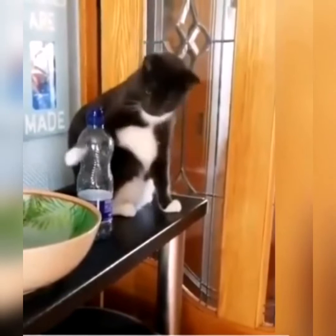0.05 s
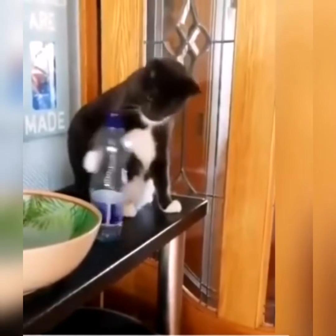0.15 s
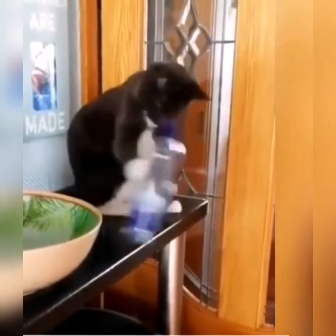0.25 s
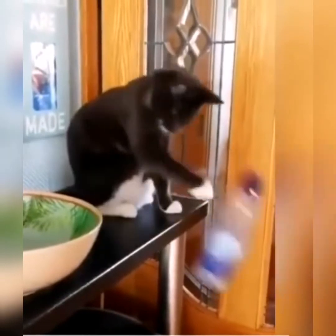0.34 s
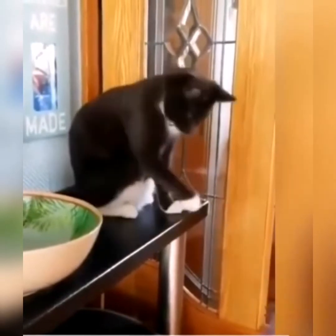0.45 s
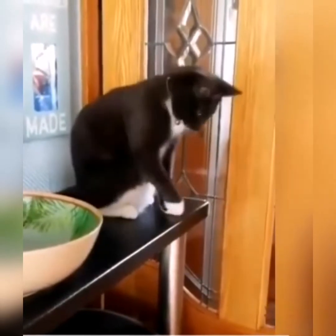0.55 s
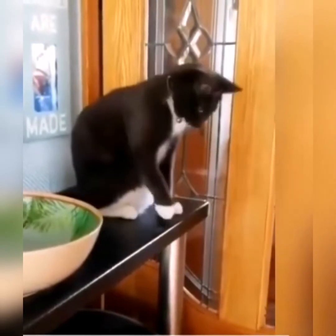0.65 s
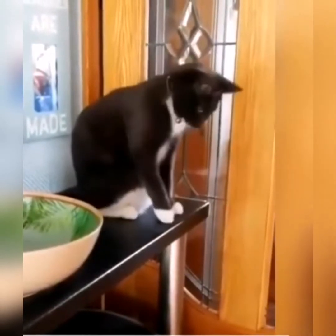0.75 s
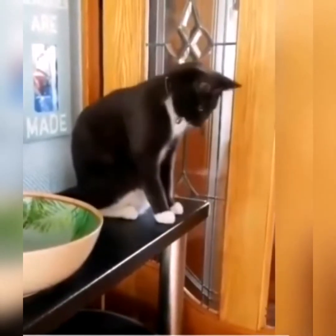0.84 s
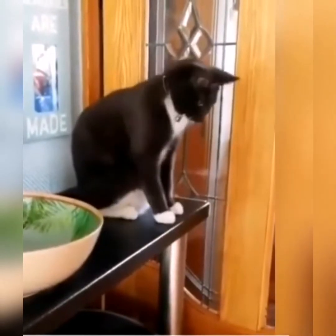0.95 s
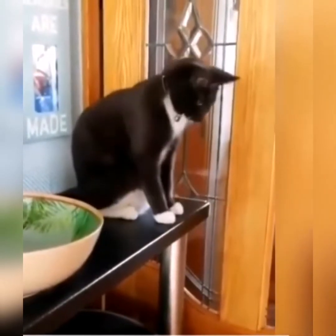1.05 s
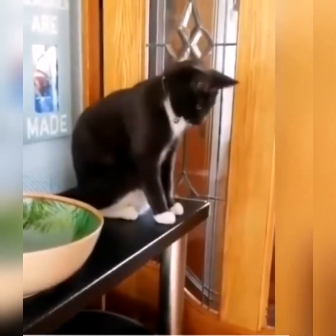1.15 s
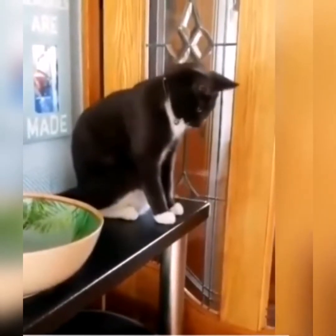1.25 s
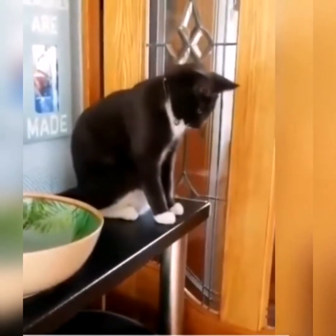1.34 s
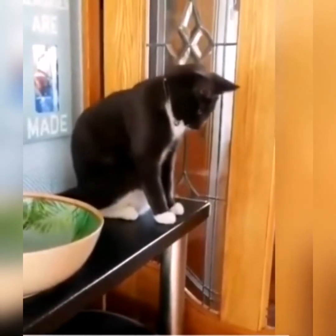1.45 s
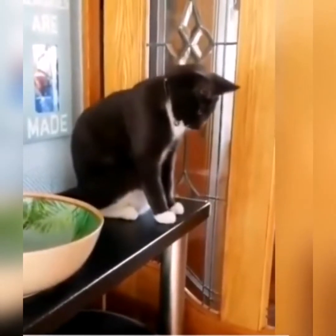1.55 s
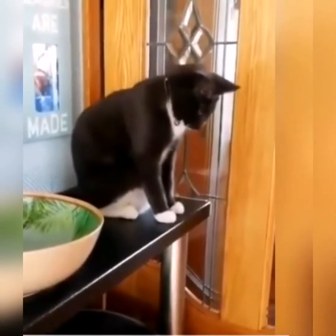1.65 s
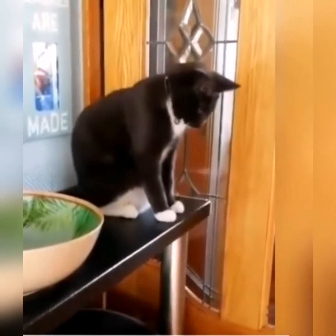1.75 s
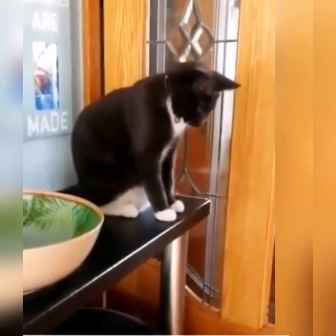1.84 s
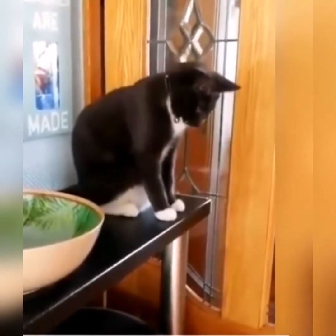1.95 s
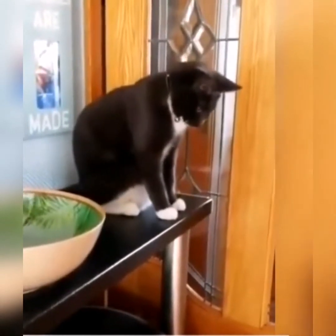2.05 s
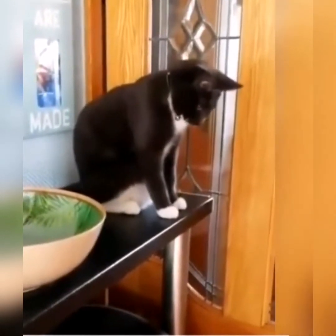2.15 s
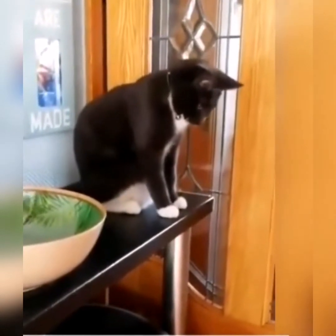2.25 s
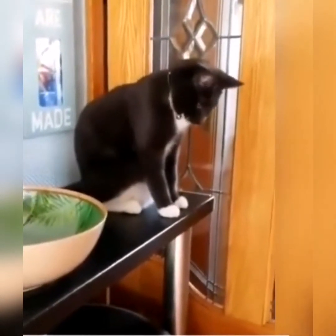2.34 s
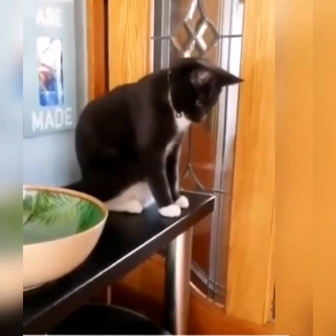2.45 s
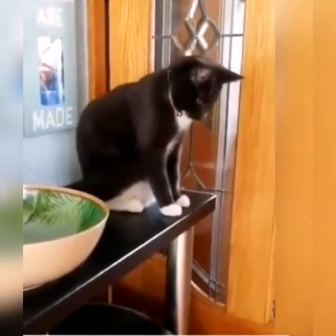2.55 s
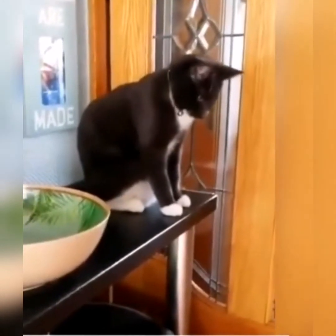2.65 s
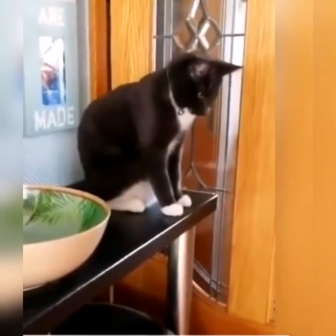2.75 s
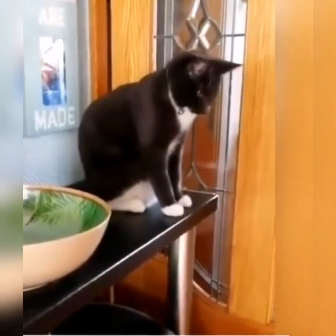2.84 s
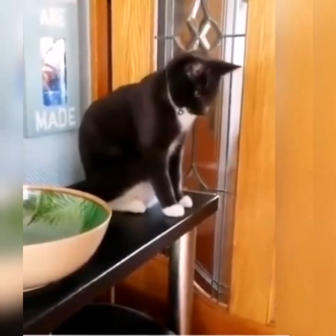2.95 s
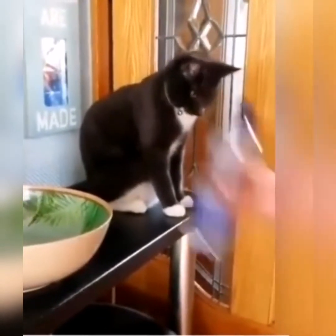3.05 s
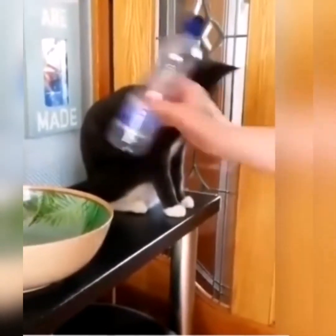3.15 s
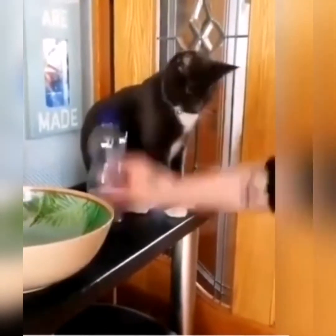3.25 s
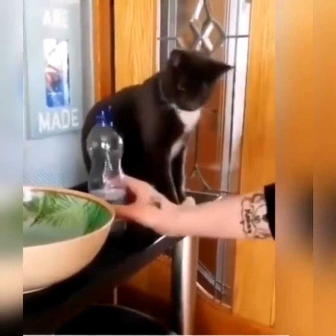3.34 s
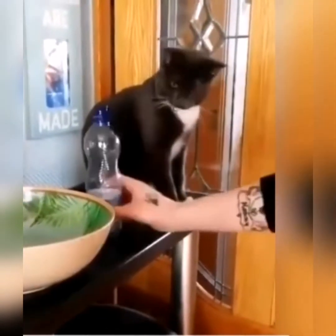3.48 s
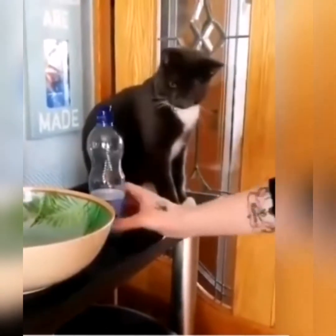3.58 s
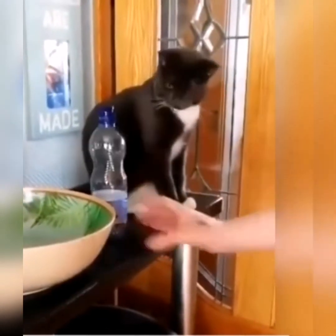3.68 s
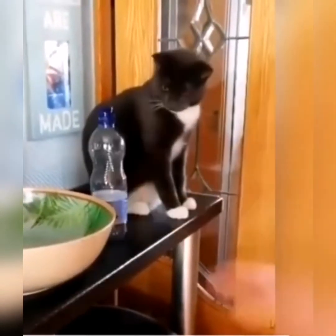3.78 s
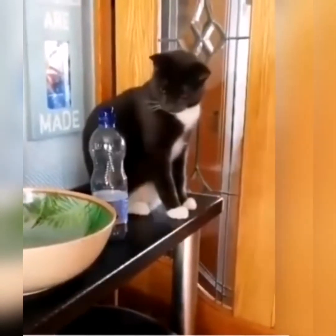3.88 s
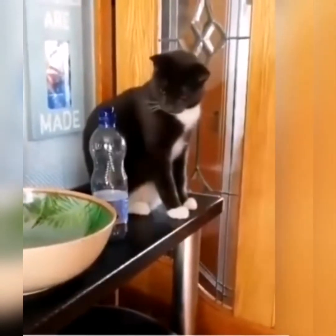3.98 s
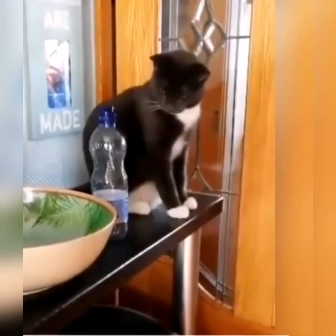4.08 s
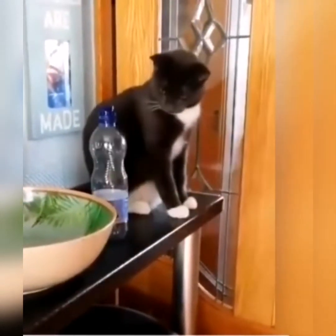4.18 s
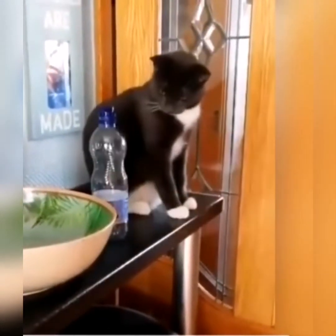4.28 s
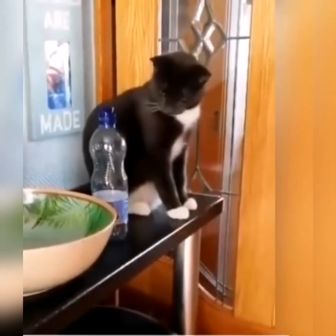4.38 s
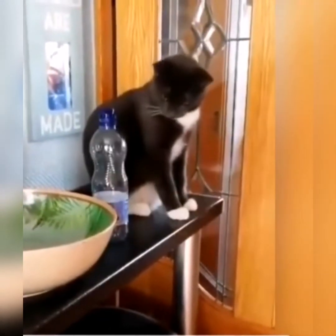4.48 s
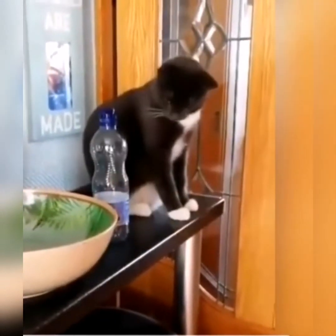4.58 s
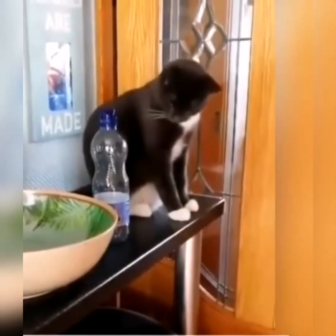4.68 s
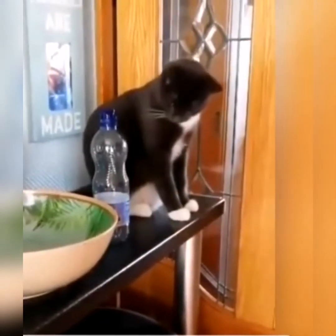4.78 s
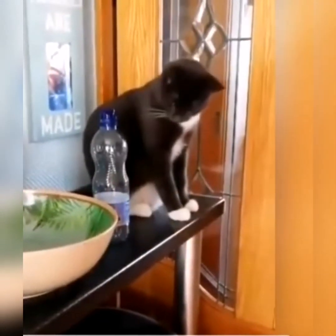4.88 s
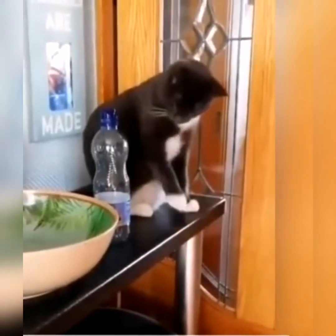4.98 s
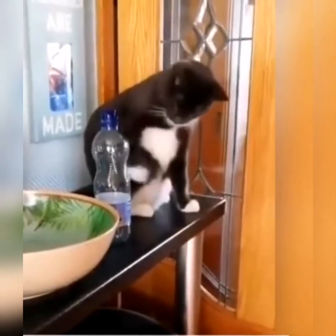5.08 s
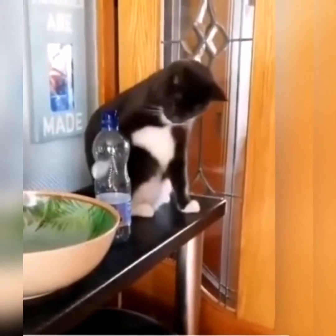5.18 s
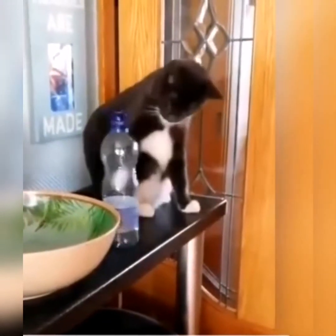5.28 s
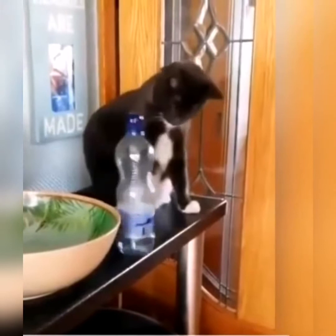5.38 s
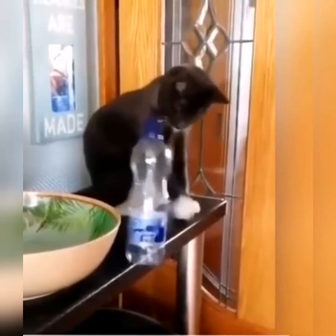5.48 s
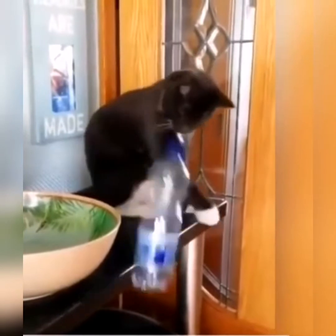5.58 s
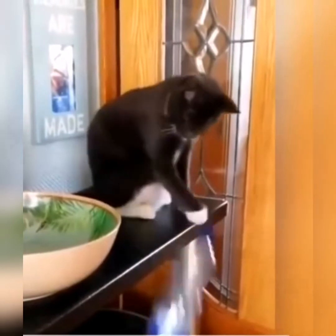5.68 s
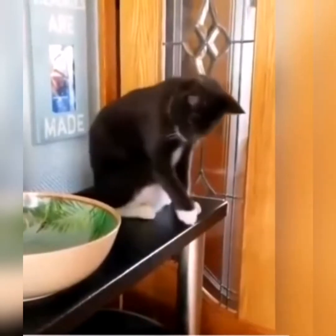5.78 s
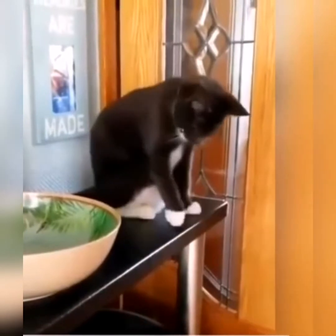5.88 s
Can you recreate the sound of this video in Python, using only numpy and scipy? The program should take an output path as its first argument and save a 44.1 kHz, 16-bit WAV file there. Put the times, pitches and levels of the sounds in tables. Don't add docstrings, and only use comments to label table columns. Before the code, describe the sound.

An empty plastic bottle drops from a shelf, bounces hollowly on a hard floor, is knocked back upright, then falls again with a clatter.

```python
import sys
import numpy as np
from scipy import signal
from scipy.fft import rfft, irfft, dct
from scipy.io import wavfile
from scipy.ndimage import uniform_filter1d

SR = 44100
rng = np.random.default_rng(int(sys.argv[2]) if len(sys.argv) > 2 else 0)


def gain_from_decibels(decibels):
    exponent = np.asarray(decibels, float) / 20
    return 10 ** exponent


def dump(signal):
    limited = np.clip(np.atleast_2d(signal).T, -1, 1)
    pcm = np.round(limited * 32767).astype(np.int16)
    wavfile.write(sys.argv[1], SR, pcm)


N = 261072
TOP_HZ = 9750


def on_log(table, hz):
    f, v = np.transpose(table)
    return np.interp(np.log(hz), np.log(f), v)


def unit(x):
    return x / np.sqrt(np.mean(x ** 2))


def band(x, lo_hz, hi_hz, order=2):
    sos = signal.butter(order, [lo_hz, min(hi_hz, .45 * SR)], "band", fs=SR, output="sos")
    return signal.sosfilt(sos, x)


def walk(rate_hz):
    hold, levels = int(SR / rate_hz), 1.3 * rng.standard_normal(2048)
    steps = np.repeat(levels[:N // hold + 1], hold)
    return uniform_filter1d(uniform_filter1d(steps, hold), hold)[:N]


# f/Hz, correlation [-1..1]
LIKENESS = [(40, .93), (150, .96), (400, .1), (1000, .08), (3000, 0), (5000, .05), (8000, .45)]


def pair(size, hz):
    like = np.clip(on_log(LIKENESS, hz), 0, .99)
    mid, side = rng.standard_normal((2, size))
    return np.sqrt((1 + like) / 2) * mid + np.sqrt((1 - like) / 2) * side * np.array([[1], [-1]])


# f/Hz, level/dB per Hz
BACKGROUND = [(25, -23.5), (65, 0), (118, -12), (194, -2), (421, -5.5), (597, -15.5),
              (868, -7.5), (1200, -14), (1300, -15.5), (1840, -18), (4500, -26), (8230, -28), (9800, -39.5),
        (12700, -62)]


def hiss():
    out, swell_db = 0, walk(1.0)
    for hz in 28 * 2 ** np.arange(0, 8.6, 1 / 3):
        db = on_log(BACKGROUND, hz) + swell_db / 2 + 2.2 * walk(12)
        out = out + gain_from_decibels(db) * band(pair(N, hz), hz * 2 ** (-1 / 6), hz * 2 ** (1 / 6))
    return unit(out) * gain_from_decibels(-56.5)


# t/s, length/s, start level/dB, end level/dB
RUMBLES = [(0., 0.0582, -46, -39.5), (0.079, 0.594, -46.5, -57.5), (0.606, 0.1506, -51.5, -52.5),
           (2.866, 0.0625, -34.5, -39.5), (2.92, 0.4, -33.5, -45), (3.181, 0.068, -41, -40),
           (3.27, 0.1736, -51.5, -37.5), (3.514, 0.213, -42.5, -41.5), (3.671, 0.1605, -35, -36.5),
           (3.839, 0.3428, -44.5, -45), (4.213, 0.346, -45, -55.5), (5.113, 0.215, -42.5, -43),
           (5.332, 0.2474, -45.5, -42.5), (5.6, 0.32, -45.5, -59.5)]


def rumble():
    edge_s, calm_db = 0.021, -60
    centre_hz, hz_per_db = 215.07, 1.0
    t, power = np.arange(N) / SR, gain_from_decibels(calm_db) ** 2
    for s, length_s, from_db, to_db in RUMBLES:
        edges = np.clip(np.minimum(t - s, s + length_s - t) / edge_s + .5, 0, 1)
        power = power + edges * gain_from_decibels(np.interp(t, [s, s + length_s], [from_db, to_db])) ** 2
    db = 10 * np.log10(power)
    lowpass = signal.butter(4, 63, fs=SR, output="sos")
    murmur = signal.sosfilt(lowpass, rng.standard_normal((4, N)))
    phase = 2 * np.pi * np.cumsum(centre_hz + hz_per_db * (db + 50)) / SR
    mid, side = murmur[:2] * np.cos(phase) + murmur[2:] * np.sin(phase)
    return unit(mid + gain_from_decibels(-43.0) * side * np.array([[1], [-1]])) * gain_from_decibels(db + 1.0 * walk(30) - 5.5)


# f/Hz, t60/s
ROOM_T60 = [(300, 0.63), (1000, 0.49), (3000, 0.4), (6000, 0.36), (11000, 0.48)]


def room(feed):
    t, tail = np.arange(SR * 3 // 4) / SR, 0
    for hz in 177 * 2. ** np.arange(7):
        clumps = gain_from_decibels(4.4 * np.exp(-t / 0.18) * walk(250)[:len(t)])
        octave = band(pair(len(t), hz) * clumps, hz / np.sqrt(2), hz * np.sqrt(2))
        tail = tail + octave * 1000. ** (-t / on_log(ROOM_T60, hz))
    onset = 1 - np.exp(-(t / 0.0013) ** 2)
    tail = unit(tail * onset) / np.sqrt(len(t))
    return signal.fftconvolve(feed[None], tail, axes=1)[:, :N]


# peak t/s, level/dB, swell/s, fade/s per 20 dB (negative:
# rises on), f/Hz
SINGS = [(.06, -57.5, 0.046, .08, 934), (.125, -44, 0.0234, 0.136, 925), (.132, -46.5, 0.024, 0.068, 2924),
         (.15, -49.5, 0.0273, 0.0759, 3337), (.135, -52.5, 0.017, 0.0065, 6150),
         (.628, -30.5, 0.0071, 0.07, 2345), (.645, -27.5, 0.0123, 0.0967, 1347),
         (.624, -29, 0.0057, 0.07, 1250), (.65, -31, 0.0194, 0.1181, 718), (.69, -34, 0.0187, 0.0953, 1050),
         (.7, -36, 0.0146, .06, 2401), (.87, -39.5, 0.0345, 0.1557, 530), (.85, -38, .015, 0.1655, 1498),
         (.88, -43, 0.0297, 0.08, 2202), (.9, -39, 0.0423, 0.09, 1077), (.905, -44.5, 0.0192, 0.0043, 651),
         (.98, -44.5, 0.0277, 0.19, 620.4), (1.57, -43.5, .012, 0.07, 2144),
         (1.61, -46.5, 0.0194, 0.0841, 1803), (2.65, -69, 0.122, 0.13, 8176),
         (2.92, -53.5, 0.032, 0.18, 3311), (2.94, -55, 0.0454, 0.37, 4799),
         (3.208, -35, 0.00385, 0.0426, 2092), (3.24, -38, .02, 0.1148, 2903),
         (3.26, -36.5, 0.0204, 0.09, 4310), (4.29, -58, 0.0147, 0.054, 3591),
         (4.32, -56.5, .03, 0.0836, 8300), (5.2, -60, .05, 0.41, 3103), (5.335, -49.5, 0.0248, 0.07, 8386),
         (5.348, -37, 0.014, 0.0774, 1504), (5.39, -45.5, .03, 0.0972, 1797),
         (5.35, -50, 0.022, 0.1244, 4425), (5.872, -36.5, .01, 0.02, 4213), (5.9, -35, .02, 0.54, 4800),
         (5.89, -38, 0.0204, -0.28, 3703), (5.872, -37.5, 0.0076, -0.08, 560),
         (5.875, -37.5, .01, -0.42, 1049), (1.158, -40, 0.00484, 0.06, 1358),
         (1.16, -43, .006, 0.0839, 3887), (1.548, -42.5, 0.00365, 0.0857, 3896)]


def sings():
    lead, size, q = SR // 8, SR // 2, 7
    out, t = np.zeros((2, N + SR)), (np.arange(size) - lead) / SR
    for s, db, swell_s, fade_s, hz in SINGS:
        grains = pair(size, hz) * gain_from_decibels(1.8 * rng.exponential(size=size))
        tone = unit(band(grains, hz * (1 - .5 / q), hz * (1 + .5 / q)))
        shape_db = np.where(t < 0, -12 * (t / swell_s) ** 2 / 2, -20 * t / fade_s)
        at = int(s * SR)
        out[:, at:at + size] += tone * gain_from_decibels(db + shape_db)
    return out[:, lead:lead + N]


# t/s, level/dB, f/Hz, t60/s
THUDS = [(3.202, -22, 176.1, 0.0666), (3.203, -28.5, 344.8, 0.06036), (3.203, -35.5, 78, 0.12),
         (5.335, -46, 619, 0.25), (3.203, -21, 765, 0.1), (3.203, -22, 930, 0.11),
         (5.866, -29.5, 168, 0.063), (5.866, -31, 283.3, 0.119), (.829, -30, 1100, 0.18),
         (1.147, -35, 540, 0.11), (1.540, -41.5, 1500, 0.19), (1.540, -44, 1850, 0.19),
         (5.338, -39, 1550, 0.3), (5.344, -39, 1500, 0.19), (5.358, -42.5, 1380, 0.12),
         (.845, -41, 520, 0.534), (.118, -46, 912, 0.31), (.618, -28.5, 645, 0.144),
         (.836, -28.5, 670, 0.14)]


def thuds():
    t, out = np.arange(N) / SR, 0
    for s, db, hz, t60_s in THUDS:
        lag = np.arccos(on_log(LIKENESS, hz)) / 2 * np.array([[1], [-1]])
        shape = np.clip((t - s) * hz, 0, 1) * 1000. ** (-np.abs(t - s) / t60_s)
        out = out + gain_from_decibels(db) * np.sin(2 * np.pi * hz * (t - s) + lag) * shape
    return out


def ring(modes, lo_hz, hi_hz, click_db):
    t, tones = np.arange(SR // 6) / SR, 0
    for hz, db, t60_s in modes:
        tones = tones + gain_from_decibels(db) * np.sin(2 * np.pi * hz * t) * 1000. ** (-t / t60_s) / np.sqrt(t60_s)
    click = gain_from_decibels(click_db) * np.sqrt(len(t) * SR / 2 / (hi_hz - lo_hz)) * (t == 0)
    return unit(band(unit(tones) + click, lo_hz, hi_hz, order=3)) / np.sqrt(len(t))


# f/Hz, level/dB, t60/s
BELLY_MODES = [(1038, -12.5, 0.094), (1147.8, -7.5, 0.085), (1252.4, -4.5, 0.02), (1360.2, 0, 0.027),
               (1510, -5.5, 0.013), (1637, -8, 0.0064)]


def shell(hollow, wall, crack, crack_hz, click_db):
    return np.array([ring(hollow, 470, 1050, -4), ring(BELLY_MODES, 950, 1800, -3),
                     ring(wall, 1750, 4700, 1), ring(crack, crack_hz, 12000, click_db)])


# peak t/s, level/dB, swell/s, hollow/dB, belly/dB
SLIDES = [(0.017, -57, 0.047, -16.5, -25), (0.128, -38, 0.0593, -4.5, -4.5), (1.0, -49.5, .06, -9, -10.5),
          (1.03, -44.5, 0.019, -3.5, -9.5), (1.295, -47.5, 0.022, -19.5, -25), (1.447, -53, 0.048, -7, -2),
          (1.609, -48, 0.055, -13.5, -5.5), (1.801, -54, 0.28, -9.5, -12.5), (1.938, -45.5, 0.046, -10, -5),
          (2.279, -57.5, 0.09, 0, 6), (2.359, -58, 0.17, -13, 1.5), (2.861, -49, 0.0097, -23.5, -8),
          (2.929, -43, 0.034, -13.5, -8.5), (3.041, -52.5, 0.09, 0.5, -8), (3.968, -55, 0.13, 0, 0),
          (4.072, -54, 0.097, -13.5, 2), (4.16, -57, 0.12, -5.5, 3), (4.3, -50, 0.033, -12.5, -13),
          (5.126, -58.5, 0.05, -11, -10.5), (5.21, -48, 0.051, -3.5, -8.5), (5.308, -50.5, 0.062, -6.5, -6),
          (5.33, -43.5, 0.022, -23.5, -5), (5.344, -42.5, 0.022, -5.5, 6), (5.37, -59.5, 0.052, 6, 1),
          (5.6, -79.5, 0.14, 5.5, -12)]


def slides():
    swell_db, fade_db_per_s, crack_db = 12, 178, -1.17
    body = shell(SHELF_HOLLOW, SHELF_WALL, FLOOR_CRACK, 4700, 1.9)
    t, power = np.arange(N) / SR, 0
    clicks = unit(rng.standard_normal(N) * gain_from_decibels(1.4 * rng.exponential(size=N))) * gain_from_decibels(1.5 * walk(40))
    for s, db, swell_s, hollow_db, belly_db in SLIDES:
        shape_db = np.where(t < s, swell_db / swell_s, -fade_db_per_s) * (t - s)
        power = power + gain_from_decibels(db + shape_db + np.array([[hollow_db], [belly_db], [0], [crack_db]])) ** 2
    return signal.oaconvolve(clicks * np.sqrt(power), body, axes=1).sum(axis=0)[:N]


def contacts(table, body, gain_db, blow):
    lead, size = SR // 200, SR // 10
    rise_s = 0.0014
    even_hz = 402.26
    force, t = np.zeros((4, N + SR)), (np.arange(size) - lead) / SR
    for s, db, hollow_db, belly_db, crack_db in table:
        rattle_s = 0.003 * .5 ** ((db + 24.5) / 46)
        shape = np.where(t < 0, .3 * np.exp(t / rise_s), np.exp(-t / rattle_s))
        pops = rng.standard_normal(size) * gain_from_decibels(3.6 * rng.exponential(size=size)) * shape
        pops = pops / np.sqrt(np.sum(pops ** 2)) * np.array([[.15], [.7], [1], [1]])
        pops[:, lead] = np.array([1, .7, blow, blow]) * np.clip((db + 44) / 22, .15, 1)
        lines = rfft(pops, axis=1)
        smooth = uniform_filter1d(np.abs(lines) ** 2, size=int(even_hz * size / SR), axis=1)
        even = irfft(lines / np.sqrt(smooth), size, axis=1)
        family_db = np.array([[hollow_db], [belly_db], [0], [crack_db]])
        at = int(s * SR) - lead
        force[:, at:at + size] += gain_from_decibels(db + gain_db + family_db) * even
    return signal.oaconvolve(force[:, :N], body, axes=1).sum(axis=0)[:N]


# f/Hz, level/dB, t60/s
SHELF_HOLLOW = [(764, -1, .06), (860, -6, .03), (942, 0, .06)]
SHELF_WALL = [(2038, -1.5, 0.0084), (2417, -4, 0.013), (2963, -2.5, 0.0077), (3560.5, 2.5, 0.0051),
              (4185, -1, 0.0034)]
SHELF_CRACK = [(5290, -5.5, 0.0032), (6700, -7, 0.028), (6990, -2, 0.004), (7328, -2, 0.011),
               (8068, -0.5, 0.0082), (9184, 1, 0.0054)]
# t/s, wall level/dB, hollow/dB, belly/dB, crack/dB
TAPS = [(2.8555, -45, -13, -19, -16.5), (3.1445, -33.5, -8, -9.5, 8.5), (3.191, -50.5, -14, 17, 0),
        (3.196, -34, -16, 4.5, 0), (3.2035, -15.5, -10, -12, -3), (3.2152, -25.5, -10, -10.5, 11.5),
        (3.2255, -35.5, -0.5, -8, 15.5), (3.231, -33.5, -13, -11.5, 8.5), (3.2465, -37.5, 0.5, -2.5, 19.5),
        (3.2575, -38, -4, -19, 17), (3.272, -40, -6.5, -7, 14.5), (3.4685, -42, -29, -11, 4),
        (3.471, -20.5, -28.5, -16, 10), (3.4765, -33, -32.5, -8.5, 9), (3.4875, -31, -21.5, -17, 7.5),
        (3.4918, -30, -22.5, -15.5, 11.5), (3.509, -39, -16.5, -18.5, 13.5), (5.108, -50, -11, -8.5, -6.5)]


def taps():
    return contacts(TAPS, shell(SHELF_HOLLOW, SHELF_WALL, SHELF_CRACK, 4700, -2.0), 14.8, 0.6)


# f/Hz, level/dB, t60/s
FLOOR_HOLLOW = [(522, -4, .1), (590, -6, .05), (655, -2, .08), (775, -5, .04), (950, -4, .05)]
FLOOR_WALL = [(2002, -3.5, 0.012), (2235.4, -1, 0.015), (2510, -0.5, 0.012), (2809.5, -1, 0.01),
              (3562, -2, 0.0036), (4094, -7.5, 0.01)]
FLOOR_CRACK = [(6329, -2, 0.0091), (7207, -3.5, 0.023), (7973, 0.5, 0.022), (8247, 11, 0.0031),
               (9273, 7, 0.007)]
# t/s, wall level/dB, hollow/dB, belly/dB, crack/dB
BOUNCES = [(0.6148, -14.5, -12, -1, -3.5), (0.6175, -14, -16.5, -4, -12), (0.6223, -18.5, -10, -2.5, -6),
           (0.626, -15, -12.5, -3, -10), (0.638, -21, -9.5, -0.5, -2.5), (0.652, -17.5, -9.5, -4.5, -5.5),
           (0.8292, -27, -6.5, 2, 1.5), (0.834, -29, -3, 1, 4), (1.0597, -32.5, -6.5, -4, 2),
           (1.064, -34, -4, -4, 5.5), (1.085, -42, -5, -9, 10), (1.1482, -19, -20, -7, -13.5),
           (1.162, -30.5, -27, 1.5, -23), (1.168, -31.5, -10, -5, 2), (1.278, -50, 7.5, -7, 16.5),
           (1.5405, -25.5, -27.5, -15.5, 1.5), (1.549, -32.5, -30.5, -18, -10), (1.917, -61.5, 1, 2, 11),
           (5.853, -50.5, 9.5, -16, 13.5), (5.858, -40, 10, -12.5, 2), (5.863, -41.5, -6.5, -8.5, 4),
           (5.8675, -18.5, -11, -10, 0), (5.872, -20, -16.5, -13, 4), (5.8795, -22.5, -24.5, -21.5, 4),
           (5.889, -29.5, -21, -12, 12), (5.895, -24, -9, -19, 5.5)]


def bounces():
    hits = contacts(BOUNCES, shell(FLOOR_HOLLOW, FLOOR_WALL, FLOOR_CRACK, 6200, -1.5), 15.54, 0.45)
    first_fall = hits * (np.arange(N) / SR < 5)
    return hits - 0.55 * signal.lfilter(*signal.iirpeak(5691, 3.9, fs=SR), first_fall)


def scene():
    low, high, rub, knock = bounces(), taps(), slides(), thuds()
    seen = signal.sosfilt(signal.butter(1, 853.5, "high", fs=SR, output="sos"), low)
    direct = gain_from_decibels(-3.5) * seen + gain_from_decibels(-1.0) * high + gain_from_decibels(-9.0) * rub + gain_from_decibels(2) * knock
    t, landings_s = np.arange(N) / SR, [0, .826, 1.144, 1.535, 5.8, 6]
    floor = sum(room(low * ((t >= a) & (t < b))) for a, b in zip(landings_s, landings_s[1:]))
    shelf = room(high + gain_from_decibels(-12.0) * rub + gain_from_decibels(-3.5) * knock.mean(axis=0))
    return direct + gain_from_decibels(1.5) * floor + gain_from_decibels(1.5) * shelf + rumble() + hiss() + sings()


# f/Hz, step re neighbourhood/dB, least step/dB
ROUNDING = [(300, -26, -95), (900, -15, -90), (1650, -5, -82), (1900, -1, -80), (2200, 0, -78),
            (4000, 5, -72), (8600, 3, -66), (9600, 2.5, -60)]
# t/s, length/s, top f/Hz
NARROW_TOP = [(0, .07, 9000), (.17, .05, 9000), (.22, .15, 8250), (.51, .05, 9000), (.68, .12, 8900),
              (2.04, .09, 8700), (2.22, .08, 9100), (2.4, .06, 9000), (2.93, .19, 9000), (3.17, .05, 8700),
              (3.4, .03, 9000), (3.71, .14, 8200), (3.85, .04, 9000), (4.52, .07, 9000), (4.59, .13, 8400),
              (4.79, .05, 8600), (4.97, .05, 9000), (5.24, .03, 9000), (5.46, .05, 9200), (5.58, .09, 8250),
              (5.67, .13, 9000)]
# t/s, length/s, low f/Hz, high f/Hz
EMPTY_DIP = [(1.3, .2, 1750, 2050), (2.93, .15, 1850, 2050), (3.3, .09, 1700, 2050),
             (3.54, .12, 1700, 1950), (.16, .04, 3900, 4200), (.22, .06, 5150, 5550),
             (.85, .05, 4000, 4400), (.89, .13, 5500, 6100), (1.17, .08, 5700, 6200),
             (4.35, .05, 6100, 6800), (5.39, .09, 5700, 6200), (5.45, .05, 6200, 7200),
             (5.39, .1, 3650, 3900), (1.36, .07, 3450, 3850), (1.55, .12, 8450, 9000),
             (1.59, .08, 4800, 5150), (3.38, .03, 3300, 3800)]


def thin(x):
    hop = 1024
    half, count = hop // 2, N // hop + 2
    window = np.sin(np.pi * (np.arange(2 * hop) + .5) / (2 * hop))
    turn = np.array([[1, 1], [1, -0.952]]) / np.sqrt(2)
    padded = np.pad(turn @ x, ((0, 0), (hop, (count + 1) * hop - N)))
    frames = padded[:, np.arange(count)[:, None] * hop + np.arange(2 * hop)] * window
    a, b, c, d = np.split(frames, 4, axis=2)
    folded = np.concatenate([-c[..., ::-1] - d, a - b[..., ::-1]], axis=2)
    lines = dct(folded, type=4, norm="ortho", axis=2)
    bands = lines.reshape(2, count, -1, 8)
    hz = (np.arange(bands.shape[2]) + .5) * 8 * SR / 2 / hop

    slope = np.diff(frames[0] / window).reshape(count, -1)[:, :2040]
    bright = np.mean(slope.reshape(count, 8, -1) ** 2, axis=2)
    attack = np.max(bright[:, 1:] / bright[:, :-1], axis=1) > 6

    around = uniform_filter1d(np.mean(bands[0] ** 2, axis=2), size=7, axis=1)
    around = uniform_filter1d(around, size=2, axis=0)
    chance = uniform_filter1d(rng.standard_normal((count, len(hz))), size=4, axis=0)
    chance = uniform_filter1d(chance, size=2, axis=1)
    spent = np.convolve(attack, [0, 1, 1, 1, 1, 1])[:count, None] > 0
    coarser_db = 12.5 * chance + np.where(attack[:, None], -19, 2.5 * spent)
    rule = np.array(ROUNDING)
    masked_step = np.sqrt(np.abs(around)) * gain_from_decibels(on_log(rule[:, :2], hz))
    step = np.maximum(masked_step, gain_from_decibels(on_log(rule[:, ::2], hz)))
    step = (step * gain_from_decibels(coarser_db))[..., None]
    rounded = np.sign(bands) * np.floor(np.abs(bands) / step + 0.5296) * step

    start_s = np.arange(count)[:, None] * hop / SR
    for s, length_s, top_hz in NARROW_TOP:
        keep = (start_s < s) | (start_s > s + length_s) | (hz < top_hz)
        rounded = rounded * keep[..., None]
    for s, length_s, lo_hz, hi_hz in EMPTY_DIP:
        keep = (start_s < s) | (start_s > s + length_s) | (hz < lo_hz) | (hz > hi_hz)
        rounded = rounded * keep[..., None]

    folded = dct(rounded.reshape(lines.shape), type=4, norm="ortho", axis=2)
    p, q = folded[..., :half], folded[..., half:]
    frames = np.concatenate([q, -q[..., ::-1], -p[..., ::-1], -p], axis=2) * window
    joined = frames[:, 1:, :hop] + frames[:, :-1, hop:]
    return turn @ joined.reshape(2, -1)[:, :N]


# t/s, length/s, level/dB, top f/Hz
OPEN_TOP = [
    (3.151, 0.014, -55, 15060),
    (3.481, .055, -54, 11400),
    (5.912, .02, -62, 19150),
]


def open_top():
    t, out = np.arange(N) / SR, 0
    for s, length_s, db, hz in OPEN_TOP:
        edges = np.clip(np.minimum(t - s, s + length_s - t) / .003, 0, 1) ** 2
        out = out + gain_from_decibels(db) * unit(band(pair(N, hz), TOP_HZ, hz, order=6)) * edges
    return out


def low_pass(x):
    return signal.sosfilt(signal.butter(12, 19500, fs=SR, output="sos"), x)


def record(dry):
    port = dry - 0.26 * signal.lfilter(*signal.iirpeak(1900, 6.5, fs=SR), dry)
    rounded = np.tanh(1.867 * port) / 1.4434
    cut = signal.sosfilt(signal.ellip(8, .2, 45, TOP_HZ, fs=SR, output="sos"), rounded)
    return low_pass(thin(cut) + open_top())


dry = scene()
out = record(dry)
dump(out)
```